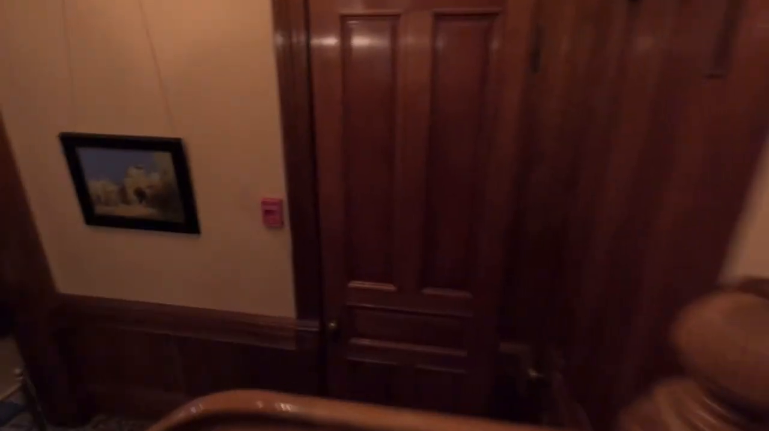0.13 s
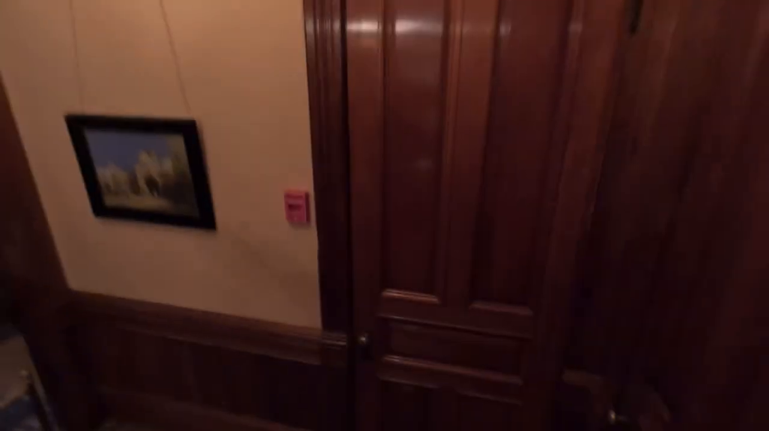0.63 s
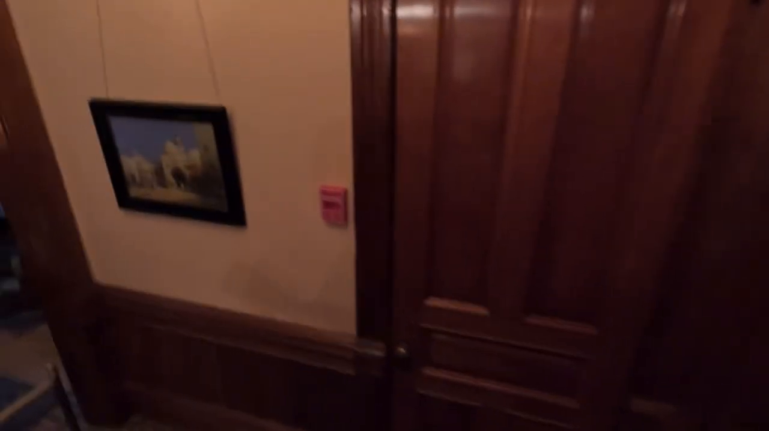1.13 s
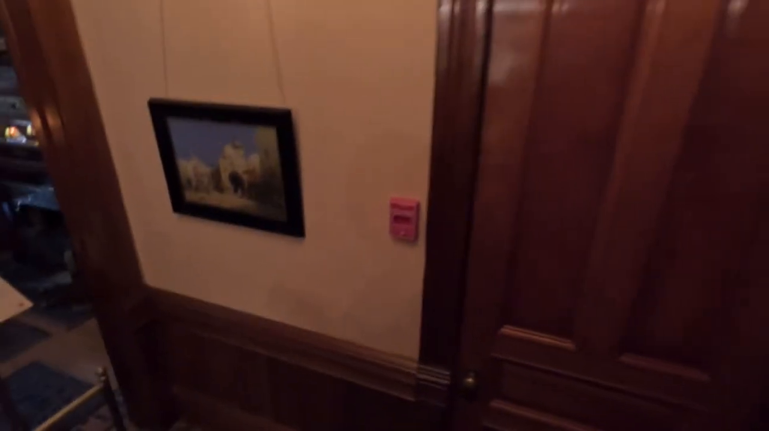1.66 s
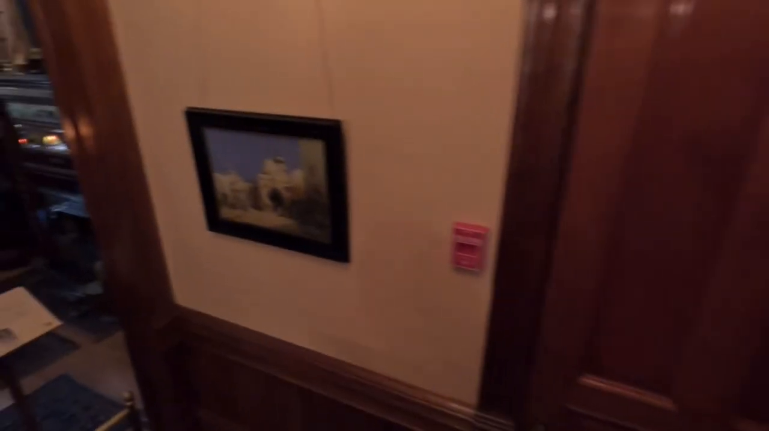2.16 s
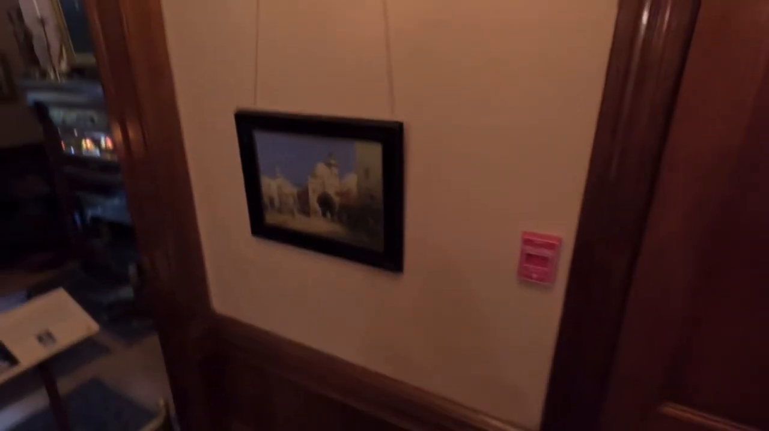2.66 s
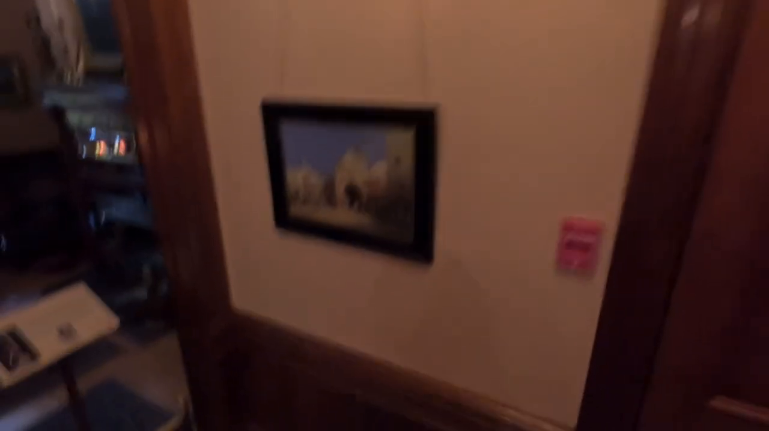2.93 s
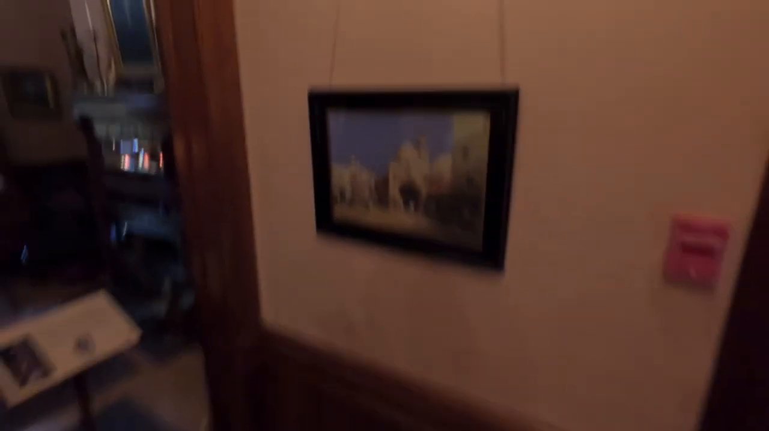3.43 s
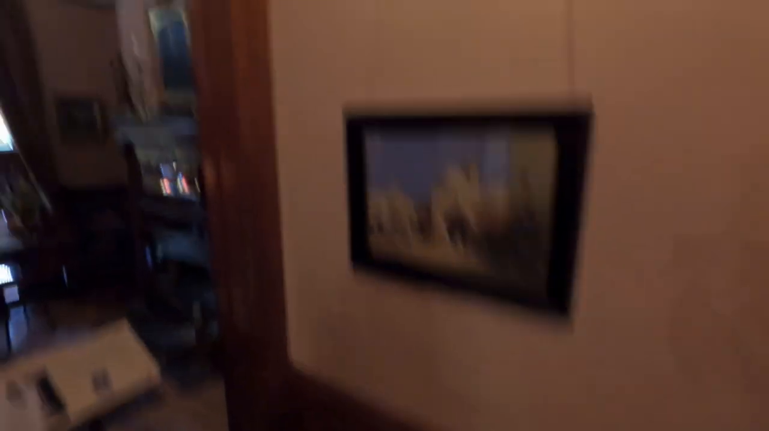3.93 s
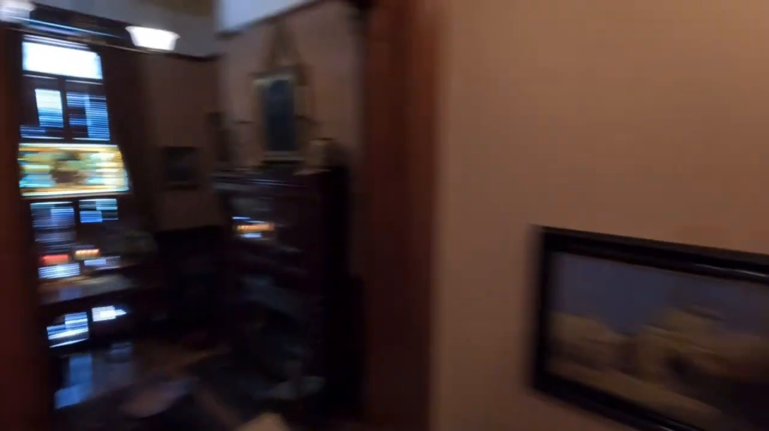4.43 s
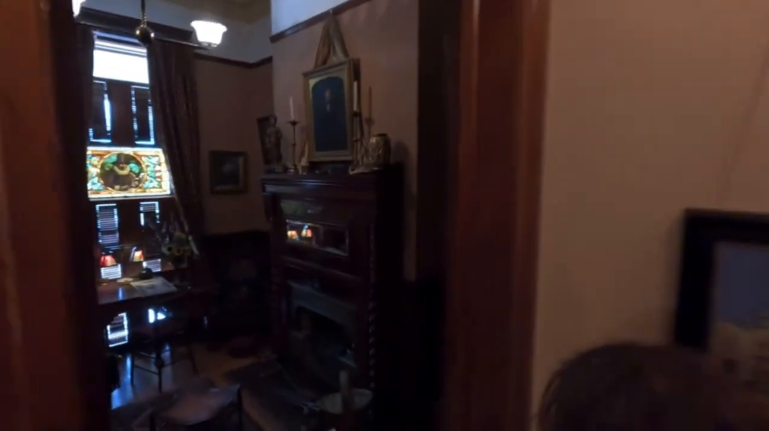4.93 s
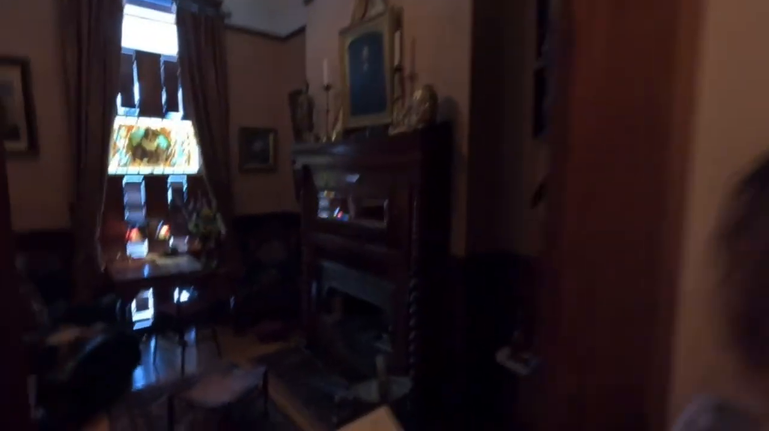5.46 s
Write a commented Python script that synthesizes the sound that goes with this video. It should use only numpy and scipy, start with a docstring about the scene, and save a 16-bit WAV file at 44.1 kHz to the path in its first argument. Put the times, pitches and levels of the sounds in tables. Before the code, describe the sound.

Uneven footsteps on booming old floorboards, soles scuffing and clothes rustling, small wooden ticks and a brief plastic clack from a handheld camera.

```python
"""Soles and clothes scuff in uneven strokes over a hollow wooden floor that booms and rattles (shaped noise);
heels of several people thump it (sliding, dying tones).
Boards tick (noise cracks and wood modes), a small hard part clacks on a handheld camera, one board groans.
The hand rocks the camera below the boom; a small reverberant hall, room hiss and a faint drone lie behind."""
import sys
import numpy as np
from scipy import signal
from scipy.fft import rfft, irfft, next_fast_len
from scipy.io import wavfile

SR = 44100
rng = np.random.default_rng(int(sys.argv[2]) if len(sys.argv) > 2 else 0)


def dump(signal):
    """Clip the signal to [-1, 1] and save it as 16-bit WAV at the path in sys.argv[1]."""
    limited = np.clip(np.atleast_2d(signal).T, -1, 1)
    pcm = np.round(limited * 32767).astype(np.int16)
    wavfile.write(sys.argv[1], SR, pcm)


def natural_amplitude(level_db):
    """Convert a level in decibels to a linear amplitude factor, elementwise."""
    exponent = np.asarray(level_db, float) / 20
    return 10 ** exponent


N = 245637

# heel blows: (time [s], peak [dB], joist pitch at onset [Hz], ring t60, at least 0.03 in the blow [s],
# pitch rise in the first 30 ms [octaves])
HEEL_BLOWS = [(0.314, -30, 114, 0.54, -0.069), (0.446, -23, 96, 0.061, 0.48),
              (0.504, -33, 125.8, 0.56, 0.2), (0.52, -23, 360, 0.022, 0.18),
              (0.573, -25.5, 72, 0.098, 0.12), (1.119, -27.5, 104, 0.042, 1), (1.129, -30, 98, 0.026, 0.16),
              (1.166, -29.5, 129.3, 0.4, 0.07), (1.211, -27, 236, 0.18, 0.079),
              (1.703, -32, 155.2, 0.37, -0.19), (1.726, -23.5, 157, 0.041, 0.45),
              (1.775, -28, 149, 0.027, 0.72), (1.839, -31.5, 127, 0.098, 0.63),
              (1.882, -27, 141, 0.049, -0.019), (1.977, -29.5, 164, 0.25, -0.033),
              (2.353, -33.5, 111.6, 0.22, -0.23), (2.536, -29.5, 49.5, 0.13, -0.26),
              (2.757, -32, 68, 0.23, -0.21), (2.8, -27, 120, 0.034, 0.42), (2.917, -22, 106.2, 0.084, 1.7),
              (2.944, -30, 100, 0.077, -0.42), (2.961, -32, 234, 0.065, 0.2),
              (2.977, -30, 109, 0.19, -0.43), (3.09, -32, 151, 0.04, 0.29), (3.108, -33, 109, 0.13, 0.45),
              (3.13, -26, 101, 0.082, -0.04), (3.572, -27.5, 101.5, 0.19, -0.09),
              (4.135, -25, 181.5, 0.043, 0.39), (4.153, -26, 150, 0.057, 0.38),
              (4.147, -23.5, 68.5, 0.29, -0.03), (4.493, -34, 136, 0.11, 0.41),
              (4.808, -29.5, 101.3, 0.39, 0.055), (4.885, -22.5, 96.4, 0.16, -0.13),
              (4.968, -23.5, 97, 0.16, -0.14), (5.227, -25, 96.3, 0.41, -0.032),
              (5.402, -18, 104.4, 0.088, -0.071)]


def heels():
    """Each heel rings a joist: a dying low tone, its pitch sliding as the weight settles, with a stiffer overtone."""
    out, t = np.zeros(N), np.arange(SR // 2) / SR
    for s, peak_db, hz, t60_s, rise_oct in HEEL_BLOWS:
        cycles = np.cumsum(hz * 2 ** (rise_oct * np.minimum(t / 0.03, 1))) / SR
        overtone = 0.2 * np.sin(2 * np.pi * 2.35 * cycles) * np.exp(-t / 0.03)
        ring = np.sin(2 * np.pi * cycles) + overtone
        swell = 1 - np.exp(-(t * hz / 0.5) ** 2)  # over about a cycle
        blow = natural_amplitude(-60 * t / max(t60_s, 0.03)) * swell * ring
        add(out, s, -natural_amplitude(peak_db) * blow / abs(blow).max())  # the floor gives way first
    return out


# slow floor motion: (time [s], joist boom between heel blows [dB], camera rocking in the hand [dB],
# board rattle without the soles' share [dB])
FLOOR_MOTION = [(0.0, -43, -42, -34.5), (0.17, -43.5, -39, -76), (0.31, -48, -51, -48),
                (0.49, -32.5, -41, -61), (0.79, -51.5, -32, -41.5), (1.05, -45, -53, -72),
                (1.23, -35, -36, -45), (1.61, -59, -54.5, -74), (1.81, -42.5, -57, -65),
                (1.91, -34, -33, -35.5), (2.09, -75, -39, -79), (2.28, -50.5, -48, -52.5),
                (2.74, -45.5, -36.5, -49), (3.02, -43, -40, -53.5), (3.34, -52.5, -42, -50),
                (4.08, -44.5, -36.5, -51.5), (4.13, -39, -57, -73), (4.25, -41.5, -33, -40),
                (4.59, -49.5, -54, -64), (4.87, -41.5, -42, -48), (4.98, -61, -37, -72),
                (5.57, -36, -51, -62)]
BOOM_HZ_AT_MINUS_45_DB, BOOM_RISE_HZ_PER_DB = 90.2, 2.5  # a harder driven floor booms higher
AFTER_BOOM_DB = -18  # relative to the heel blow
AFTER_BOOM_T60_RATIO = 5.2  # to the ring's t60
RATTLE_SOLES_DB = -2  # rattle under scuffing soles, relative to the soles


def floor_boom():
    """Soft footfalls and heel aftermath drive joist and board resonances; the camera rocks slowly below them."""
    bed_db, rock_db, rattle_db = curves(FLOOR_MOTION)
    start_s, heel_db, _, t60_s, _ = np.transpose(HEEL_BLOWS)
    fade_db_per_s = 60 / (AFTER_BOOM_T60_RATIO * t60_s)
    boom = strokes(bed_db, start_s, 0, heel_db + AFTER_BOOM_DB, 0.016, fade_db_per_s)
    boom_hz = BOOM_HZ_AT_MINUS_45_DB + BOOM_RISE_HZ_PER_DB * (20 * np.log10(boom) + 45)
    shake, rock = rng.standard_normal((2, N))
    joists = evened(resonate(resonate(shake, boom_hz, 70), boom_hz, 88))
    boards = sum(resonate(resonate(shake, hz, w), hz, 2 * w) for hz, w in [(175, 189), (300, 36.0)])
    slow_rock = resonate(resonate(rock, 17.8, 19.4), 18.5, 19.4)
    fast_rock = resonate(resonate(rock, 44.0, 22), 44.0, 22)
    rocking = evened(slow_rock + 0.32 * fast_rock)
    rattle = np.hypot(natural_amplitude(rattle_db), natural_amplitude(RATTLE_SOLES_DB) * rubbing()[0])
    return boom * joists + rattle * evened(boards) + natural_amplitude(rock_db) * rocking


# steady shuffling under the strokes: (time [s], soles [dB], cloth rustle [dB], thin cloth swish [dB])
SHUFFLE_BED = [(0.0, -45, -63, -85), (0.28, -61, -64, -75), (0.56, -49, -56.5, -70),
               (0.84, -56.5, -59.5, -68.5), (1.71, -58.5, -67, -75.5), (1.94, -41.5, -56, -71.5),
               (2.22, -57, -61, -74), (2.67, -56.5, -61, -72), (3.02, -48.5, -56, -65),
               (3.47, -59.5, -59.5, -67), (3.97, -54, -62, -67.5), (4.2, -50, -56, -73),
               (5.1, -59, -53.5, -73.5), (5.57, -44.5, -65, -88)]
# strokes of soles and clothes: (start [s], hold including its share of the rise [s], soles peak [dB],
# rustle peak [dB], swish peak [dB])
SCUFF_STROKES = [(0, 0.0028, -40.5, -52, -61), (0.084, 0.033, -46.5, -68, -78),
                 (0.14, 0.011, -45.5, -48, -80), (0.294, 0.03, -45, -57, -70),
                 (0.384, 0.0085, -53, -59, -80), (0.428, 0.026, -44, -71, -85),
                 (0.486, 0.012, -41.5, -58, -74), (0.51, 0.067, -39.5, -56, -81),
                 (0.657, 0.011, -50, -48, -72), (0.852, 0.015, -59, -58, -76), (0.93, 0.012, -50, -82, -87),
                 (1.133, 0.13, -38, -52.5, -76), (1.355, 0.03, -43, -57, -86),
                 (1.525, 0.08, -48.5, -75, -75), (1.729, 0.031, -45, -64, -70),
                 (1.756, 0.045, -40, -49, -66), (1.827, 0.085, -38, -50, -67.5),
                 (2.045, 0.011, -43.5, -71, -68), (2.115, 0.017, -68, -58, -62),
                 (2.352, 0.029, -49, -81, -89), (2.419, 0.049, -44, -62, -84), (2.527, 0.08, -44, -58, -83),
                 (2.735, 0.014, -43, -69, -81), (2.75, 0.068, -45, -58, -79), (2.812, 0.014, -44, -58, -66),
                 (2.852, 0.028, -57, -56, -65.5), (2.975, 0.039, -69, -77, -82),
                 (3.02, 0.017, -56, -68, -74), (3.152, 0.071, -48.5, -50, -66),
                 (3.366, 0.017, -50, -62, -66), (3.411, 0.066, -47, -55, -78),
                 (3.563, 0.13, -49.5, -81, -86), (3.67, 0.063, -62, -57.5, -72),
                 (3.81, 0.051, -51.5, -52, -63), (3.884, 0.11, -44, -55.5, -84),
                 (4.009, 0.032, -61, -47, -57), (4.133, 0.036, -41.5, -49.5, -76),
                 (4.16, 0.092, -43.5, -55, -80), (4.268, 0.072, -45.5, -71, -84),
                 (4.435, 0.053, -43.5, -78, -71), (4.539, 0.016, -55, -51, -87),
                 (4.641, 0.0079, -42.5, -53, -80), (4.697, 0.032, -42.5, -50, -72),
                 (4.78, 0.088, -41.5, -51.5, -67), (4.866, 0.019, -39, -71, -81),
                 (4.92, 0.033, -40.5, -48.5, -60), (5.163, 0.019, -45, -57, -66),
                 (5.222, 0.031, -37, -47.5, -65), (5.279, 0.13, -42.5, -61, -72),
                 (5.432, 0.072, -42, -64, -78), (5.504, 0.079, -60, -56.5, -71)]
STROKE_RISE_S, STROKE_RISE_SHARE = 0.00067, 0.17  # base rise; share of hold spent rising: long ones swell slower
SOLES_FADE_DB_PER_S, CLOTH_FADE_DB_PER_S = 212, 201


def rubbing():
    """Amplitudes with which soles, cloth and its thin swish are rubbed at each moment."""
    start_s, hold_s, *peaks_db = np.transpose(SCUFF_STROKES)
    fades = SOLES_FADE_DB_PER_S, CLOTH_FADE_DB_PER_S, CLOTH_FADE_DB_PER_S
    rise_s = STROKE_RISE_S + STROKE_RISE_SHARE * hold_s
    steady_s = hold_s * (1 - STROKE_RISE_SHARE)
    return [strokes(bed_db, start_s, steady_s, peak_db, rise_s, fade)
            for bed_db, peak_db, fade in zip(curves(SHUFFLE_BED), peaks_db, fades)]


# soles on wood: (frequency [Hz], relative density [dB per Hz])
SOLES_SPECTRUM = [(150, -12.5), (250, -1.5), (329, -4.5), (360, -29), (402, -7), (746, -10.5), (972, -10),
                  (1430, -15), (3500, -33), (4550, -43), (7700, -120)]
# cloth rustle: (frequency [Hz], relative density [dB per Hz])
RUSTLE_SPECTRUM = [(1290, 3), (2200, 0), (2830, 0), (3500, -1.5), (4110, -3), (7590, -16.5), (9000, -49),
                   (11700, -35), (19800, -120)]
# thin cloth swish: (frequency [Hz], relative density [dB per Hz])
SWISH_SPECTRUM = [(4120, -6.5), (7000, -2.5), (8190, -5.5), (9410, -7), (10700, -10.5), (14800, -25)]


def scuffing():
    """Rubbing as gritty noise: a woody body from the soles, a finer rustle and a thin swish on top."""
    drag, rustle, swish = rubbing()
    soles = evened(colour(gritty(0.33, 350, smear_s=0.003), SOLES_SPECTRUM))
    cloth = gritty(0.4, 400, smear_s=0.004)
    rustling = rustle * evened(colour(cloth, RUSTLE_SPECTRUM))
    swishing = swish * evened(colour(cloth, SWISH_SPECTRUM))
    return drag * soles + rustling + swishing


# boards and buckles ticking, soles catching; levels before pan: (time [s], snap peak [dB], snap centre [Hz],
# snap t60 [s], wood peak [dB], wood brightness [dB per octave])
TICK_EVENTS = [(0.148, -59, 2800, 0.02, -36.5, 11), (0.306, -41.5, 3420, 0.02, -53, 1),
               (0.388, -40, 3800, 0.022, -27.5, 5.5), (0.436, -52, 2490, 0.019, -42, -1),
               (0.451, -53, 3000, 0.018, -32.5, 2), (0.487, -35.5, 3360, 0.018, -31.5, 7),
               (0.493, -40, 2700, 0.022, -43, 2), (0.518, -35.5, 2200, 0.041, -37, -2),
               (0.528, -46, 3300, 0.025, -43, 2), (0.534, -52, 2000, 0.018, -30.5, 0),
               (0.662, -28, 4580, 0.018, -36, -7), (0.663, -37, 3270, 0.022, -31, 6),
               (1.055, -39, 2610, 0.026, -43, 1), (1.158, -41, 2000, 0.05, -41, 16),
               (1.178, -43, 2600, 0.026, -45, 2), (1.259, -48, 2000, 0.03, -43, -4),
               (1.363, -47.5, 2810, 0.066, -50, 3), (1.533, -52, 2800, 0.033, -60, -5),
               (1.743, -56, 2510, 0.02, -45, -6), (1.776, -39, 2860, 0.039, -42, 9),
               (1.849, -50, 2270, 0.024, -33, 5), (2.133, -46, 3800, 0.13, -53, 0),
               (2.53, -60, 3100, .02, -39, -19), (2.729, -58, 3540, .025, -44, -5),
               (2.744, -44.5, 2590, 0.036, -55, 0), (2.763, -45, 2000, .04, -40, 1),
               (2.814, -39, 1010, 0.046, -48, -8), (2.863, -49, 3010, 0.03, -36, -1),
               (2.867, -52, 2800, 0.023, -32, 1), (3.021, -37.5, 6600, 0.015, -49, -4),
               (3.174, -46, 8000, 0.015, -52, 0), (3.161, -44, 1400, 0.03, -42, 3),
               (3.169, -38, 1300, 0.048, -37, -1), (3.178, -46, 1790, 0.06, -34, 6),
               (3.204, -39, 1260, 0.08, -43, -1), (3.445, -58, 3110, 0.029, -34.5, -6),
               (3.683, -46, 3020, .014, -46, -7), (3.779, -46, 3560, 0.023, -39, 11),
               (3.831, -59, 2830, 0.019, -37, 9), (3.932, -44, 2620, 0.034, -41, -7),
               (4.037, -35, 6150, 0.02, -44, 6), (4.039, -37, 4800, 0.025, -34, 9),
               (4.132, -52, 2300, 0.034, -34.5, 1), (4.164, -46, 1300, 0.018, -38, -2),
               (4.17, -42, 1000, 0.042, -30, -5), (4.2, -53, 1500, 0.027, -31, 2),
               (4.565, -34.5, 2700, 0.037, -35, 4), (4.569, -38, 2480, 0.038, -36, 0),
               (4.594, -40, 2600, 0.024, -38, 5), (4.612, -53, 2800, 0.012, -37, -3),
               (4.644, -47, 3130, 0.042, -45, 0), (4.706, -48, 3580, 0.058, -35, -10),
               (4.816, -43.5, 3230, 0.12, -44, 8), (4.938, -42, 3420, 0.026, -37, -10),
               (4.955, -31.5, 4670, 0.025, -47, -3), (5.214, -41, 5000, 0.02, -41, 4),
               (5.219, -41.5, 3600, 0.059, -33, -8)]
# wood modes under a tick: (frequency [Hz], width [Hz], level [dB])
BOARD_MODES = [(588, 102, 10), (1044, 175, 8.5), (1440, 290, 8), (2040, 610, -3), (3170, 210, -7)]
SNAP_REACH, SNAP_NARROWS_PER_S = 0.61, 6.5  # reach either side as share of centre; long snaps are narrower


def ticks():
    """A short crack around its own centre also rings the board's modes for a few milliseconds."""
    out, t = np.zeros(N), np.arange(4000) / SR
    cracks = rng.standard_normal((len(TICK_EVENTS), len(t)))
    pivot_hz = BOARD_MODES[1][0]
    for (s, snap_db, centre_hz, t60_s, wood_db, bright_db_per_oct), noise in zip(TICK_EVENTS, cracks):
        reach = max(SNAP_REACH - SNAP_NARROWS_PER_S * t60_s, 0.2)
        needle = 1 + 0.012 / t60_s * np.exp(-t / 0.001)  # first fibres break hardest, most so in short cracks
        crack = noise * needle * natural_amplitude(-60 * t / t60_s) * (1 - np.exp(-t / 0.0003))
        crack[0] = 3.1 * needle[0]  # opening click, even over the whole band
        edges_hz = np.clip([centre_hz / (1 + reach), centre_hz * (1 + reach)], 300, 15000)
        snap = signal.sosfilt(signal.butter(3, edges_hz, "bandpass", fs=SR, output="sos"), crack)
        strike = 3.7 * np.exp(-t / 0.000086)  # first contact rings every mode at once
        creaking = noise * natural_amplitude(-25 * t / t60_s) * (1 - np.exp(-t / 0.0044))  # outlasts the snap
        grind = strike + creaking
        wood = sum(natural_amplitude(db + bright_db_per_oct * np.log2(hz / pivot_hz))
                   * resonate(resonate(grind, hz, 3.9 * w), hz, w) for hz, w, db in BOARD_MODES)
        add(out, s, natural_amplitude(snap_db) * snap / abs(snap).max() + natural_amplitude(wood_db) * wood / abs(wood).max())
    return out * natural_amplitude([[0.7], [-0.7]])  # slightly to the left


# a small hard part knocking on the camera: (time [s], peak [dB])
PART_KNOCKS = [(4.5645, -43), (4.567, -33), (4.5715, -40)]
# modes of that part: (frequency [Hz], relative level [dB], t60 [s])
PART_MODES = [(1100, -6, .03), (2050, -5, .025), (2850, -3, .018), (3450, 0, .022), (4000, -2, .022)]


def clacks():
    """Every knock rings the same few short modes."""
    out, t = np.zeros(N), np.arange(4000) / SR
    modes = sum(natural_amplitude(db - 60 * t / t60_s) * np.sin(2 * np.pi * hz * t) for hz, db, t60_s in PART_MODES)
    ring = modes * (1 - np.exp(-t / 0.00059))
    for s, peak_db in PART_KNOCKS:
        add(out, s, natural_amplitude(peak_db) * ring / abs(ring).max())
    return out


# groaning board: (level before the swell [dB], from [Hz], to [Hz], width [Hz])
CREAK_TONE = -40.5, 280, 500, 260
# its timing: (start [s], length [s])
CREAK_TIME = 2.99, .05


def creak():
    """A loaded board groans upward: noise through a resonance that climbs as the board is bent."""
    (start_s, length_s), (db, from_hz, to_hz, width_hz) = CREAK_TIME, CREAK_TONE
    out, noise = np.zeros(N), rng.standard_normal(SR // 4)
    u = np.arange(0, length_s, 1 / SR) / length_s
    hz = from_hz * (to_hz / from_hz) ** u
    groan = evened(resonate(resonate(noise[:len(u)], hz, width_hz), hz, width_hz))
    add(out, start_s, natural_amplitude(db) * np.sin(np.pi * u) ** 0.5 * groan)
    return out


# reverberation: (frequency [Hz], t60 [s])
HALL_T60 = [(100, 0.063), (800, 0.52), (3000, 0.33), (10000, 0.096)]


def hall(x):
    """Sparse taps of random sign, one in every 20 samples, each band dying at its own speed."""
    taps = np.zeros((2, SR // 2))
    slots = np.arange(120, SR // 2 - 20, 20)
    at = slots + rng.integers(0, 20, (2, len(slots)))
    np.put_along_axis(taps, at, rng.choice([-1., 1.], at.shape), 1)
    hz, t, z = signal.stft(taps, SR, nperseg=256)
    decay = natural_amplitude(-60 * t / read(HALL_T60, hz)[:, None])
    tail = signal.istft(z * decay, SR, nperseg=256)[1]
    return signal.fftconvolve(x, tail / np.linalg.norm(tail[0]), axes=1)[:, :N]


# still air and microphone noise: (frequency [Hz], relative density [dB per Hz])
HISS_SPECTRUM = [(12, -9), (20, 11), (33, 6.5), (64, -13), (164, 2), (210, -10.5), (301, -6.5), (495, -19),
                 (837, -28), (1100, -22), (7230, -45.5), (12200, -54), (14800, -69)]
HISS_RMS_DB = -45.5  # before the ports
# faint narrow drone in the house: (frequency [Hz], width [Hz], rms before the ports [dB])
HOUSE_DRONE = 1000, 13.5, -66.5


def room_hiss():
    """Coloured noise for still air and the microphone's own noise; a narrow resonance of it is the drone."""
    air, (hz, width_hz, drone_db) = rng.standard_normal((2, N)), HOUSE_DRONE
    hiss = natural_amplitude(HISS_RMS_DB) * evened(colour(air, HISS_SPECTRUM))
    drone = evened(np.array([resonate(a, hz, width_hz) for a in air]))
    return hiss + natural_amplitude(drone_db) * drone


# likeness of the two ports: (frequency [Hz], correlation [0..1])
PORT_LIKENESS = [(60, 1), (150, 0.99), (370, 0.93), (930, 0.72), (2320, 0.82), (5780, 0.94), (14400, 0.19)]
# level difference of the ports: (frequency [Hz], left minus right [dB])
PORT_TILT = [(60, -0.8), (180, -1), (540, 1.2), (1610, 2), (4810, 0), (14400, 5.5)]
# phase difference of the ports: (frequency [Hz], left minus right [rad])
PORT_LEAD = [(0, -0.87), (690, 0.3), (3010, -1.08), (5080, -0.28), (11400, -0.2), (14600, -0.0)]


def ports(x, other):
    """Two close microphone ports: alike in the bass, partly unrelated and shifted in phase and level higher up."""
    size = N + N % 2
    hz = np.fft.rfftfreq(size, 1 / SR)
    same, a, b = np.clip(read(PORT_LIKENESS, hz), 0, 1), rfft(x, size), rfft(other, size)
    side = natural_amplitude(read(PORT_TILT, hz) / 2) * np.exp(0.5j * read(PORT_LEAD, hz))
    right = (same * a + np.sqrt(1 - same ** 2) * b) / side
    return irfft([a * side, right])[:, :N]


def strokes(bed_db, start_s, hold_s, peak_db, rise_s, fade_db_per_s):
    """Amplitude of a steady bed with events that rise, hold and fade; powers add."""
    power, t = natural_amplitude(2 * bed_db), np.arange(SR // 2) / SR
    for s, hold, db, rise, fade in np.broadcast(start_s, hold_s, peak_db, rise_s, fade_db_per_s):
        fading = natural_amplitude(2 * (db - fade * np.maximum(t - rise - hold, 0)))
        add(power, s, np.clip(t / rise, 0, 1) ** 2 * fading)
    return np.sqrt(power)


def gritty(depth, per_s, smear_s):
    """Two noises sharing a fine grit: random small bursts with decay constant smear_s."""
    size = np.minimum(rng.exponential(1, N), 3) * (rng.random(N) < per_s / SR)
    clumps = signal.lfilter([1], [1, -np.exp(-1 / (smear_s * SR))], size)
    return evened((1 + depth * clumps / clumps.mean()) * rng.standard_normal((2, N)))


def resonate(x, hz, width_hz):
    """Resonance of gain 1: shifts the curve hz down to zero, smooths, and shifts back."""
    turn = np.exp(2j * np.pi * np.cumsum(hz * np.ones(len(x))) / SR)
    r = np.exp(-np.pi * width_hz / SR)
    return 2 * (turn * signal.lfilter([1 - r], [1, -r], x / turn)).real


def colour(x, points):
    """Filters by a spectrum table."""
    size = next_fast_len(x.shape[-1])
    gain = natural_amplitude(read(points, np.fft.rfftfreq(size, 1 / SR)))
    return irfft(rfft(x, size) * gain, size)[..., :N]


def read(points, hz):
    """Reads a spectrum table on a log-frequency axis."""
    f, value = np.transpose(points)
    return np.interp(np.log(hz + 1), np.log(f + 1), value)


def curves(rows):
    """Joins the rows of a time table by straight lines, one array a column."""
    s, *columns = np.transpose(rows)
    return [np.interp(np.arange(N) / SR, s, c) for c in columns]


def evened(x):
    """Scales to rms 1."""
    return x / np.sqrt(np.mean(x ** 2) + 1e-20)


def add(mix, s, sound):
    """Mixes a sound in at time s [s]."""
    part = mix[..., round(s * SR):][..., :sound.shape[-1]]
    part += sound[..., :part.shape[-1]]


# microphone response to knocks and hall, treble roll-off: (frequency [Hz], gain [dB])
MICROPHONE_RESPONSE = [(20, 2), (9000, -0.5), (12000, 3), (15000, -25), (15300, -60)]


def scene():
    """Floor, heels and creak reach both ports alike; knocks and heels feed the hall; scuffs and hiss spread."""
    knocks, thumps = ticks() + clacks(), heels()
    echoes = hall(natural_amplitude(-10.0) * knocks + natural_amplitude(-25.5) * thumps)
    knocks = colour(knocks + echoes, MICROPHONE_RESPONSE)
    air = ports(*(scuffing() + room_hiss()))
    return air + floor_boom() + thumps + knocks + creak()


def band_limit(x):
    """A steep low-pass at the top of the band."""
    return signal.sosfilt(signal.butter(12, 15000, fs=SR, output="sos"), x)


def record(dry):
    """Hands on the finished stereo mix as the camera keeps it."""
    return band_limit(dry)


dry = scene()
out = record(dry)
dump(out)
```